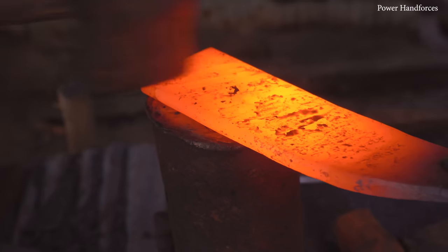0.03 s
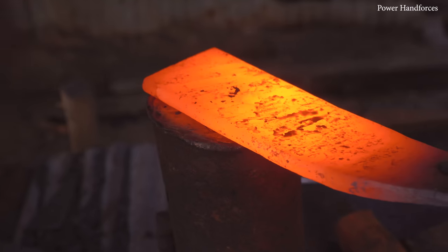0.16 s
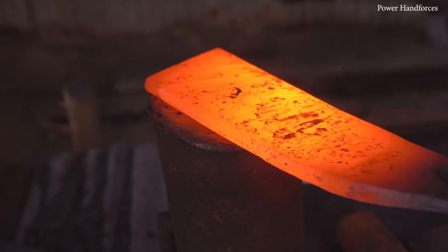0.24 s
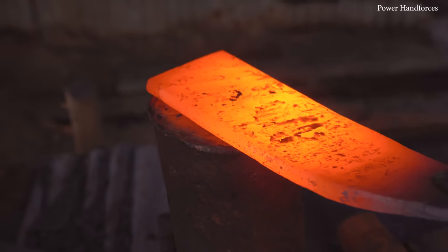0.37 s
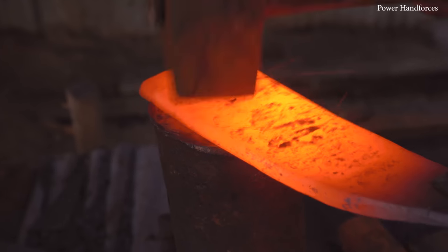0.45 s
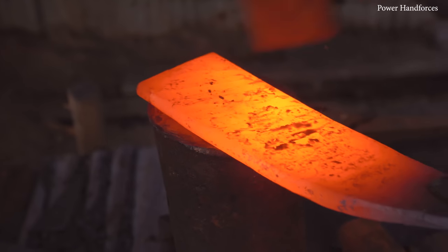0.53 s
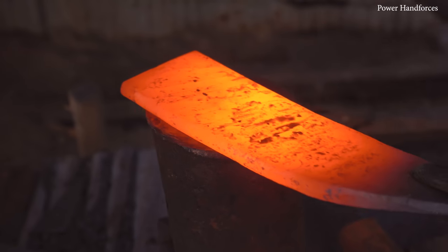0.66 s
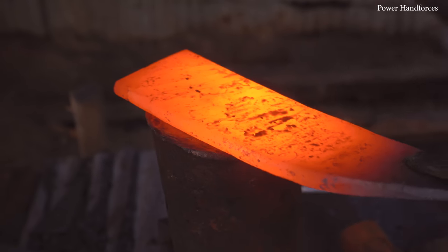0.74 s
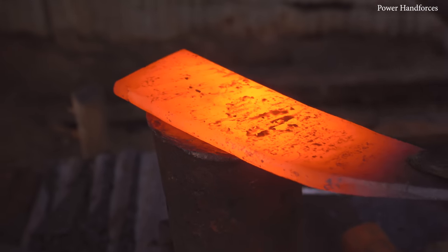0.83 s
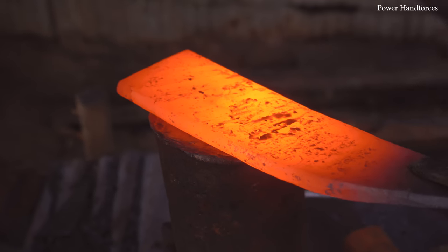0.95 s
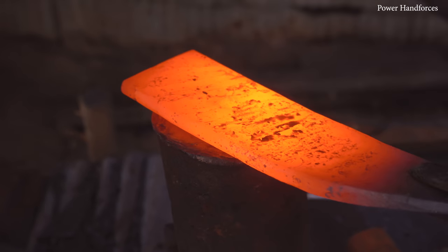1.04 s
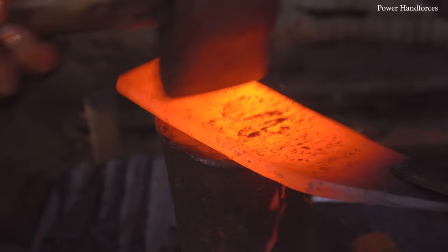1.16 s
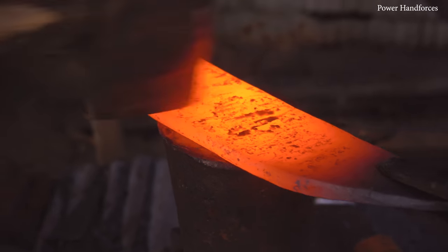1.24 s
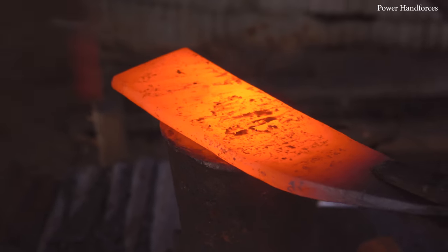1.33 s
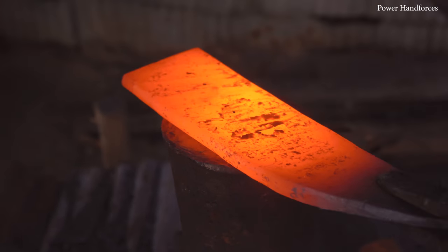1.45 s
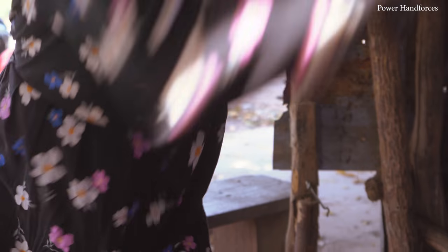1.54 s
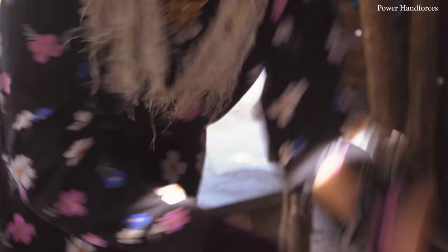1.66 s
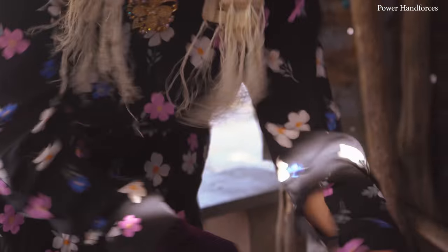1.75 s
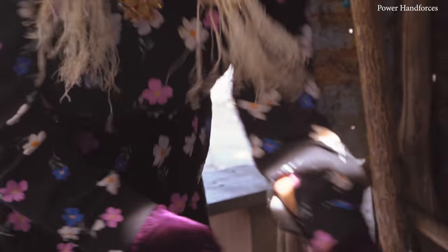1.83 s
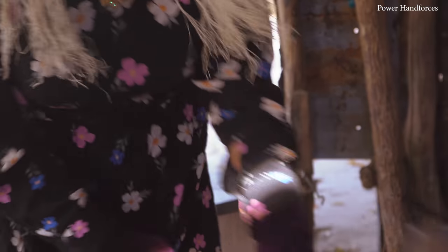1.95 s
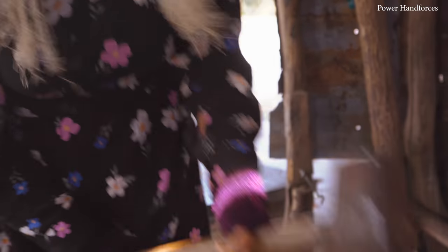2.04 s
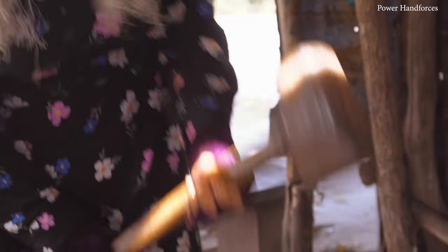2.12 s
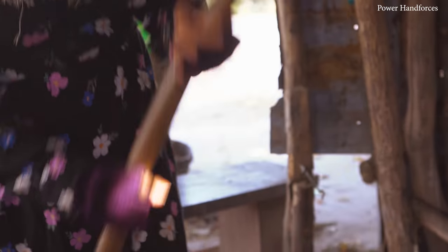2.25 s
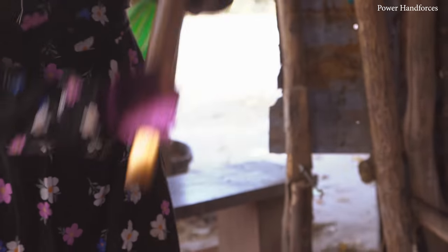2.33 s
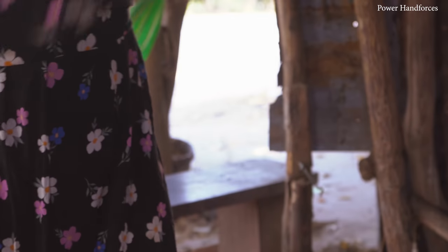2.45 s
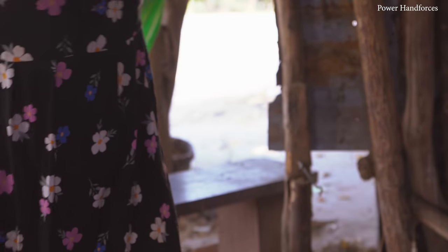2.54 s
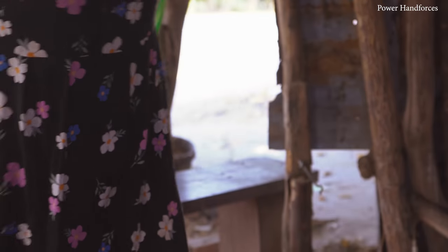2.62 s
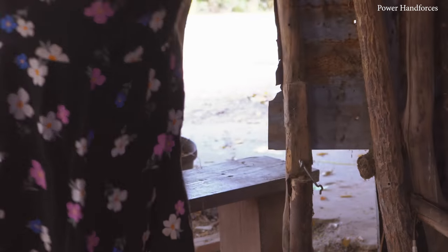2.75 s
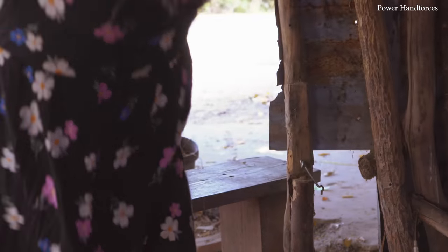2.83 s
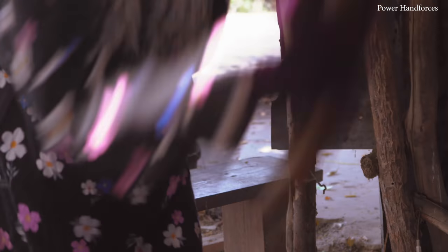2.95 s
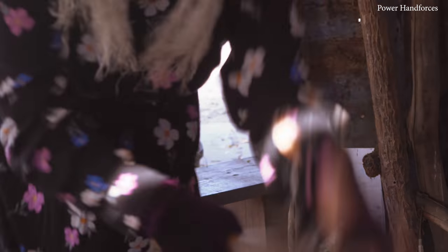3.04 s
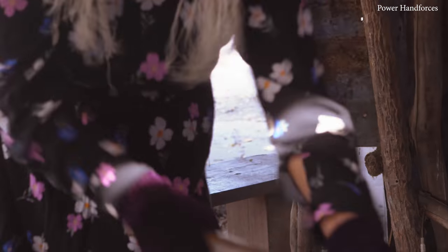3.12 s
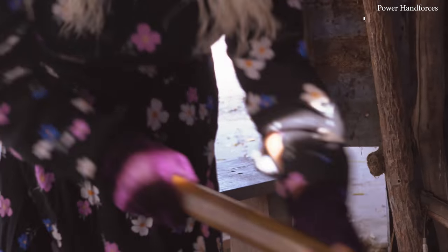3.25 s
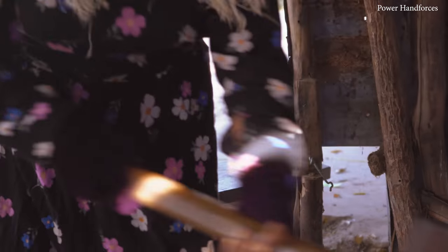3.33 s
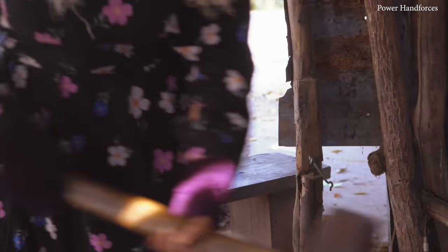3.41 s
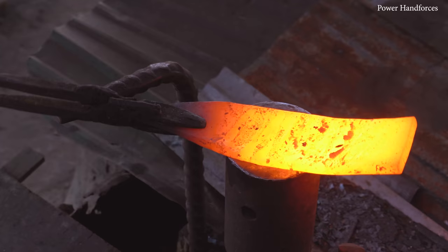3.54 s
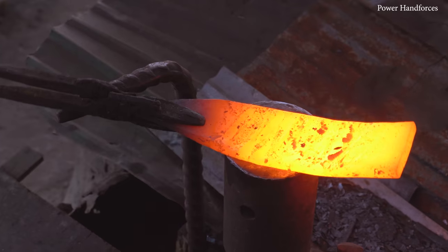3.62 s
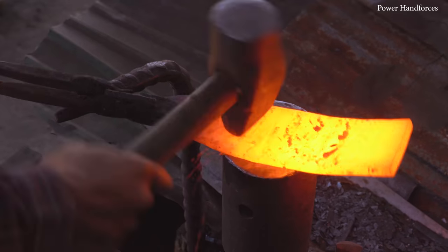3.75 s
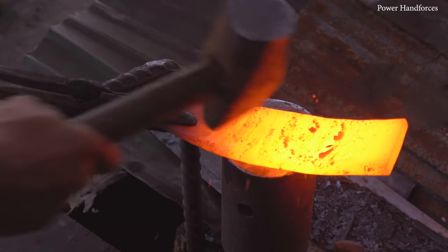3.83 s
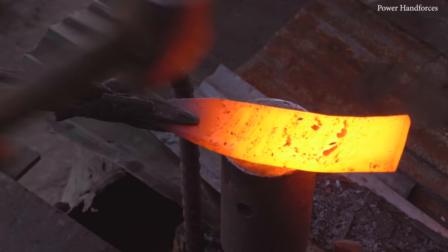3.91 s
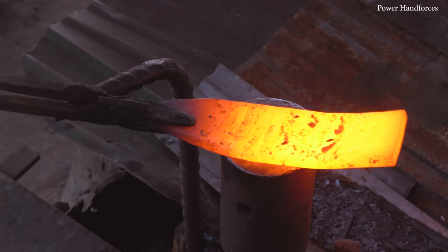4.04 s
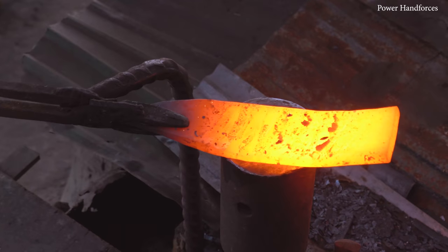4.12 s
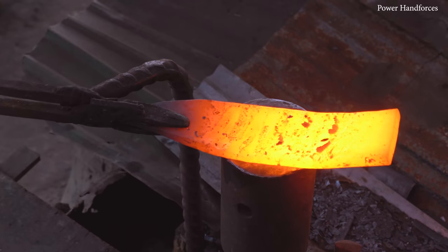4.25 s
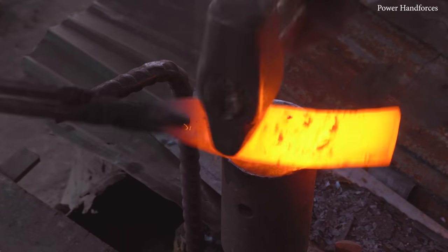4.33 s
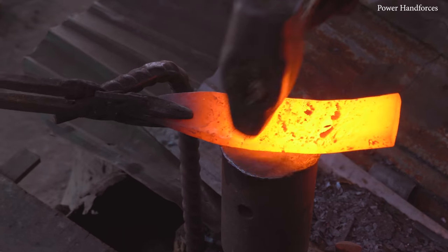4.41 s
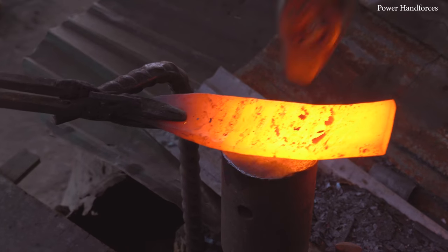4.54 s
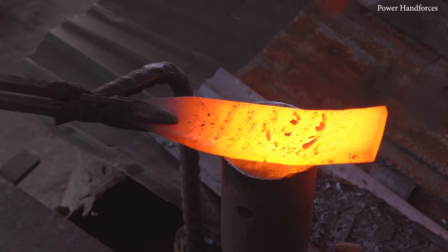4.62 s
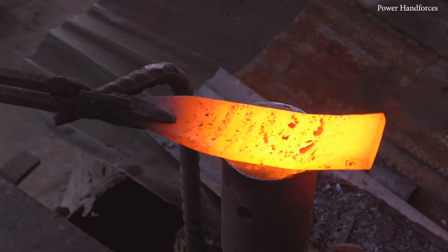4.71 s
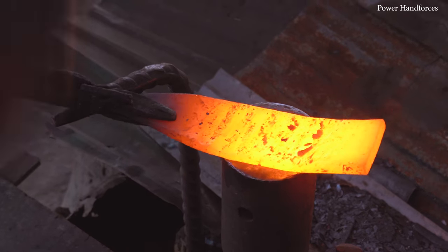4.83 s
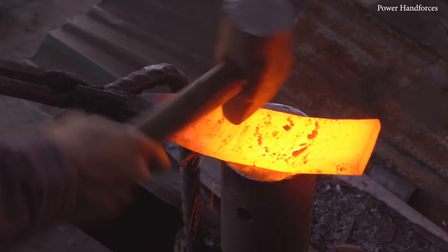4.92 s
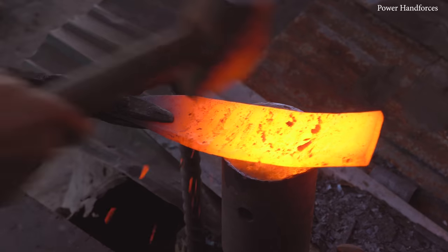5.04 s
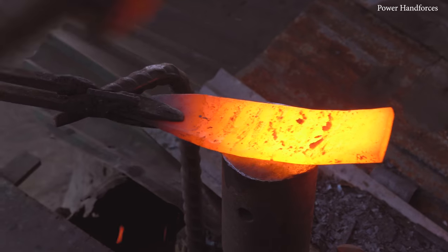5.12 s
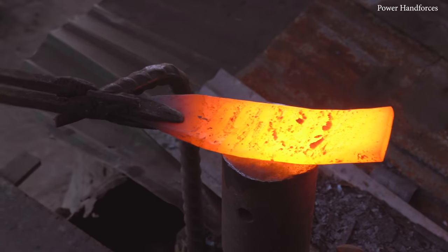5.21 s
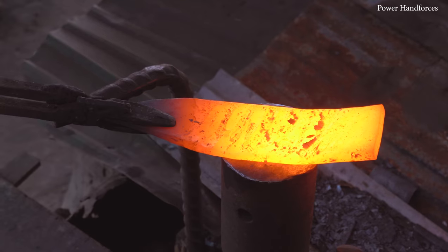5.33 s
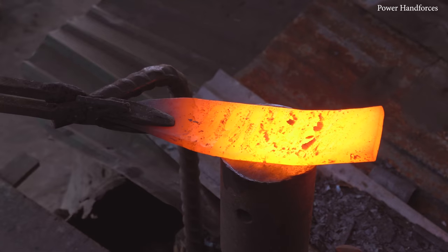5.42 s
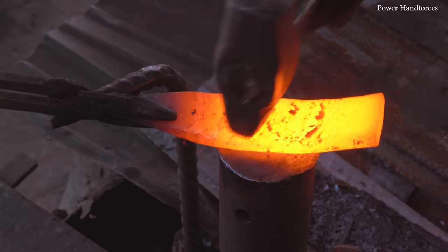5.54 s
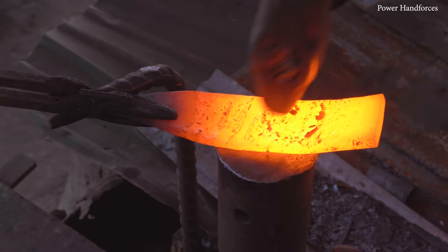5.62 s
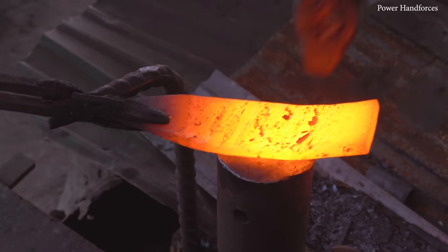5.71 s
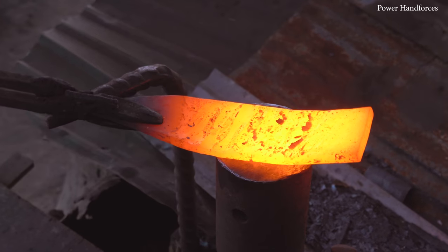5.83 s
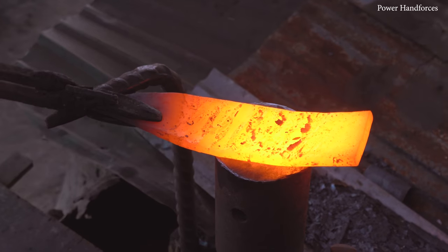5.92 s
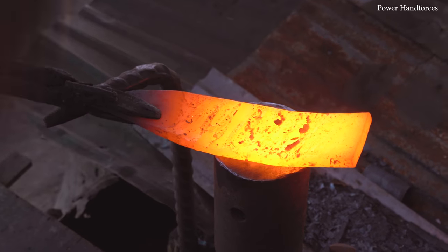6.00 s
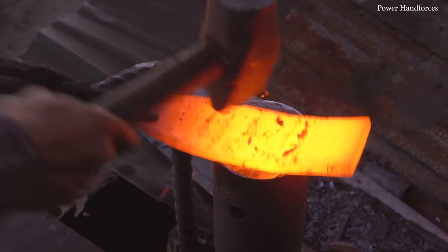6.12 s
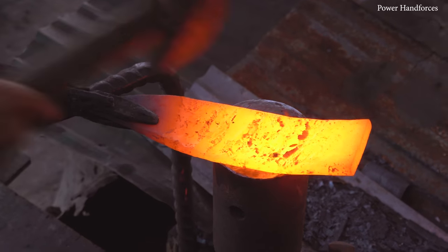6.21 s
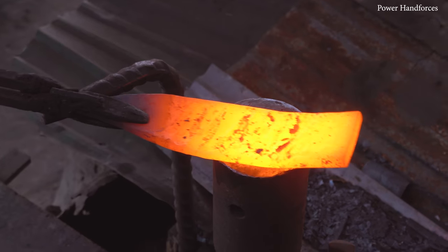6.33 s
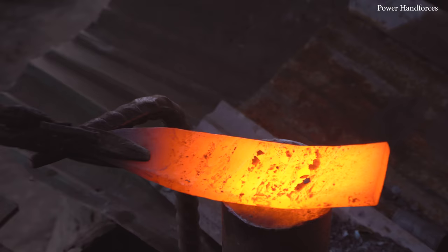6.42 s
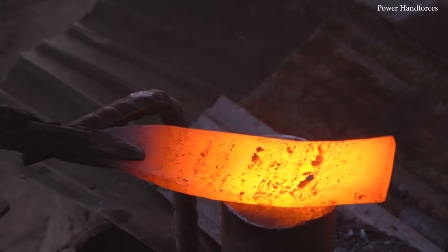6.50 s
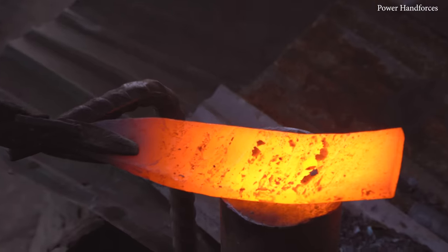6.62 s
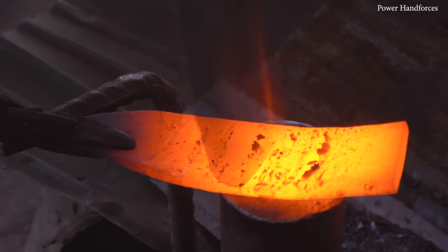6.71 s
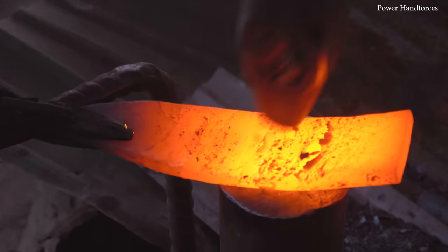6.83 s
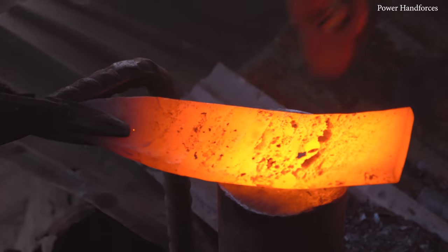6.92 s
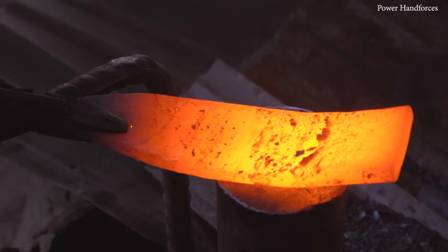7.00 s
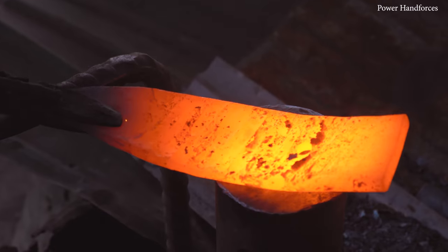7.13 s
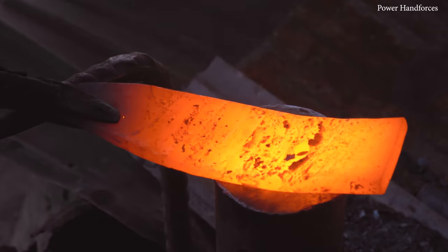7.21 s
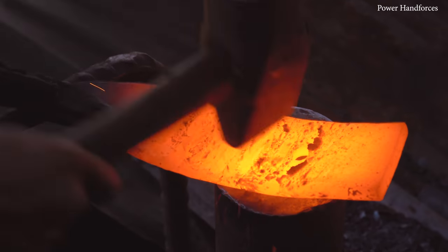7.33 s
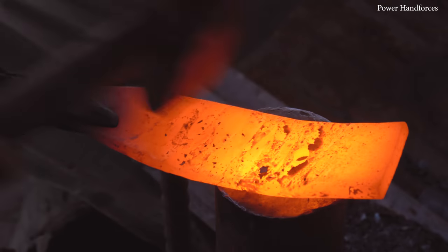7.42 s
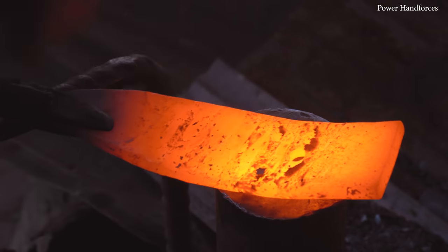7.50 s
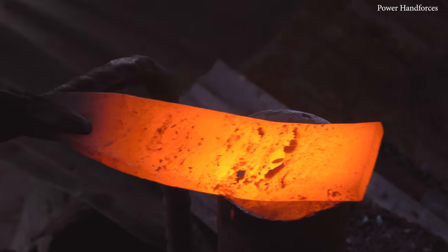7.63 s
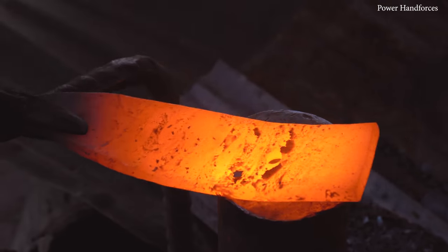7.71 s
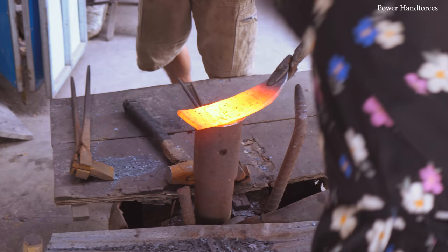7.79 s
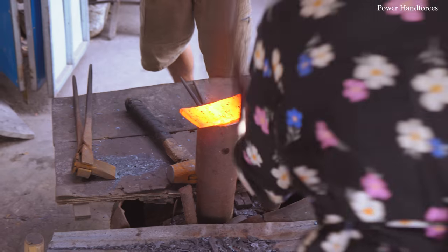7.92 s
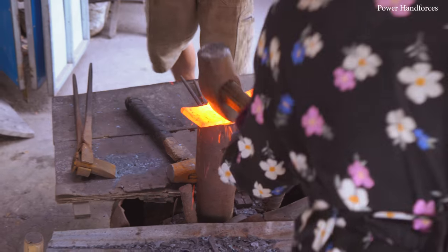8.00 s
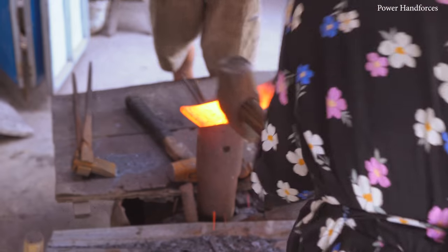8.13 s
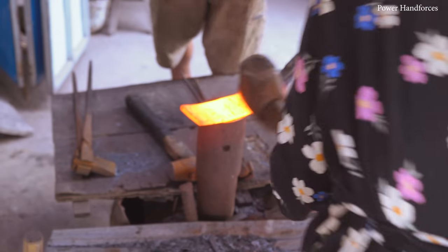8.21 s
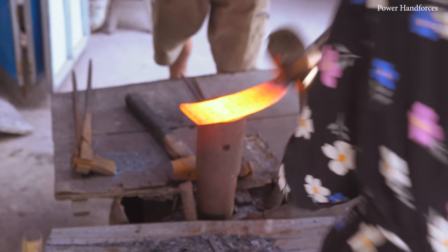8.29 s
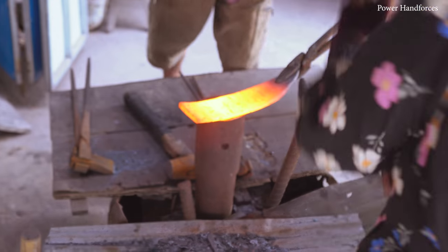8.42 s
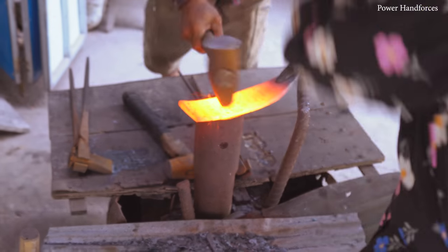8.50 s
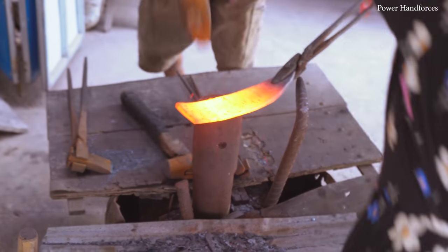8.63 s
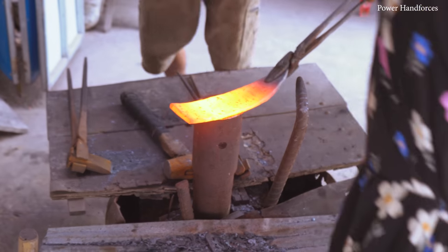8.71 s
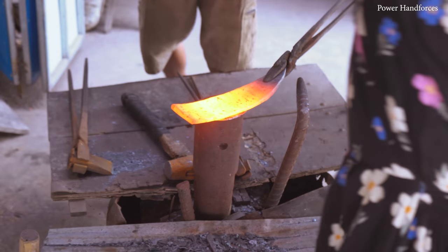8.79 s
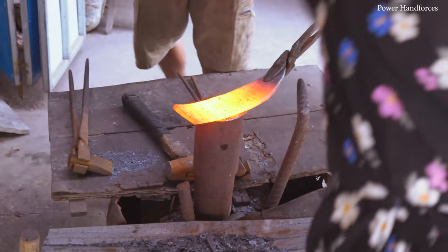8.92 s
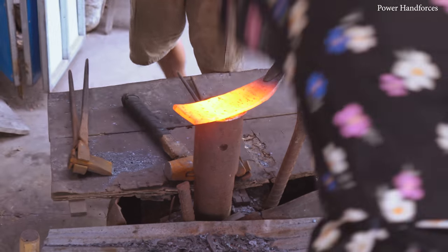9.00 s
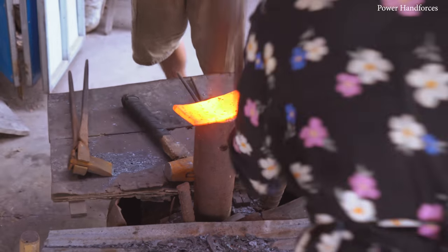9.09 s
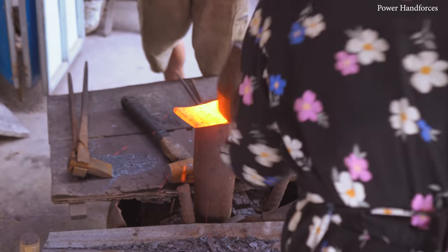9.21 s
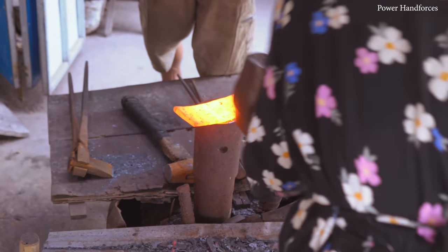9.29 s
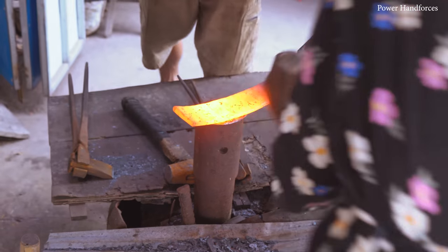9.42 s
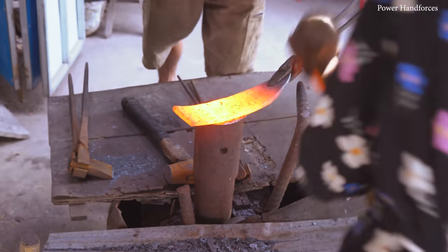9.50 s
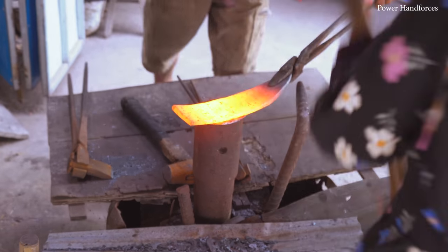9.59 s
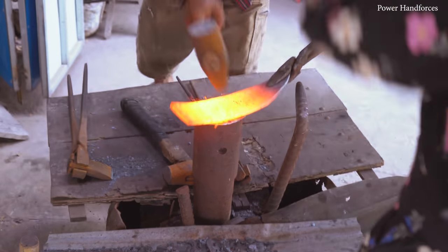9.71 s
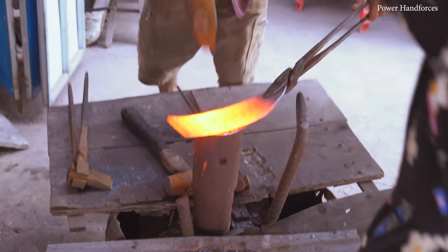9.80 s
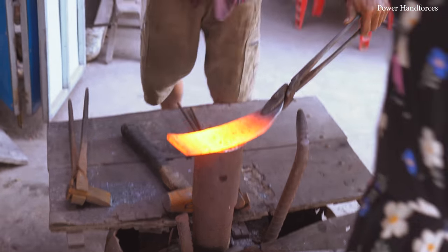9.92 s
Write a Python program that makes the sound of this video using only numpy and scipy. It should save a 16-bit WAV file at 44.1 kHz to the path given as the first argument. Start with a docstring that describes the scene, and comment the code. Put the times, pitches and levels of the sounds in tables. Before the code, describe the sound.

A heavy and a light hammer take turns striking a hot steel bar on a post anvil, starting at once and landing about every 0.6 seconds, seventeen blows in ten seconds. Each is a sharp, close crack with a short, deadened clank, a brief ring and a varying wooden thud. The sheet-metal workshop answers with an echo that dies fast, and the blows grow slightly duller over time. Scale flakes and small contacts tick between them, most clearly just after the blow at 1.3 seconds. Cloth and tongs rustle faintly, mainly from 6 to 8 seconds. Well behind, a rush like traffic swells until 3.6 seconds, changes tone and fades, then returns abruptly near 7.9 seconds and grows to the end. A faint hum sits under it from 1.5 to 3.6 seconds and again around 8 to 9. A loose part rattles quietly with a thin whine from 3.6 to about 7 seconds.

```python
"""Sharp cracks as a heavy and a light hammer take turns on a hot steel bar on a post anvil.
Hot steel deadens each blow to short rings; a sheet-metal roof and walls answer with a swell that
dies fast. Scale flakes tick, cloth and tongs rustle. Behind them a rushing noise, perhaps traffic,
swells and fades, heard from three places in turn; a loose part rattles and something hums."""
import sys
import numpy as np
from scipy import signal
from scipy.fft import rfft, irfft, next_fast_len
from scipy.io import wavfile
from scipy.ndimage import map_coordinates

SR = 44100
rng = np.random.default_rng(int(sys.argv[2]) if len(sys.argv) > 2 else 0)


def pcm_store(signal):
    """Save signal as 16-bit PCM."""
    levels = np.round(np.clip(np.atleast_2d(signal), -1, 1) * 32767)
    wavfile.write(sys.argv[1], SR, levels.astype(np.int16).T)


N = 438794

# Each row: start in seconds, hammer, relative levels in dB of swell (with all rings but the bar's),
# stump thud, hammer ring and bar clank, then clank pitch in Hz.
HAMMER_BLOWS = [(0.0476, "heavy", -18.5, -6.5, -8, -7, 4600), (0.5885, "light", -20, -5, -4, -10, 2420),
                (1.2543, "heavy", -19, 0, -1, -7, 5100), (1.8401, "light", -20, -4, -7, -15, 1950),
                (2.4395, "light", -20.5, -15.5, 1, -8, 1800),
                (3.215, "heavy", -18.5, -7.5, 4.5, -10.5, 1780),
                (3.8902, "light", -21, -13, 4, -10.5, 2060), (4.485, "heavy", -21, 2.5, -11, -5.5, 2030),
                (5.0479, "light", -22.5, -13.5, -2, -9.5, 2060),
                (5.656, "heavy", -20.5, -2.5, -6, -6.5, 2060),
                (6.2189, "light", -20.5, -10, -1, -7.5, 2100), (6.8728, "heavy", -21, -5, -24, -9.5, 2050),
                (7.4371, "light", -24, -9, 5, -9.5, 1980), (8.0798, "heavy", -20, -12.5, -7.5, -7, 1934),
                (8.6397, "light", -22, -14, -5.5, -11.5, 1960),
                (9.247, "heavy", -22.5, -6.5, -9, -4.5, 1930), (9.8153, "light", -21.5, -15, 3, -7.5, 1930)]
# Anvil post, wooden stump, hammer heads. Each row: mode in Hz, relative level in dB, T60 in seconds.
POST_MODES = [(1252, -32.5, 0.08), (1420, -35, 0.045), (2130, -22.5, 0.02)]
STUMP_MODES = [(195, -50, 0.071), (331.7, -26, 0.12), (550, -32.5, 0.07), (670, -38.5, 0.089),
               (820, -47, 0.042)]
LIGHT_HEAD_MODES = [(5760, -24, 0.075), (6770, -34, .05), (9056, -30, 0.067), (11610, -41, 0.05),
                    (13351, -35, 0.06)]
HEAVY_HEAD_MODES = [(4745, -29, 0.04), (7185, -40, .08), (8258, -28, 0.13)]
HEAD_MODES = {"light": LIGHT_HEAD_MODES, "heavy": HEAVY_HEAD_MODES}
# Hot bar. Each row: multiple of the clank pitch, relative level in dB, T60 in seconds.
BAR_MODES = [(1, -0.8, 0.015), (.66, -7.5, 0.017), (.8, -12.5, 0.011)]
# Impact noise and room swell. Each row: frequency in Hz, relative density in dB.
CRACK_SPECTRUM = [(180, -21), (300, -13.5), (1980, 4), (2550, -3.5), (3750, -2.5), (8010, -2), (10700, -14),
                  (13700, -11.5), (15700, -23), (16800, -60)]
SWELL_SPECTRUM = [(35, -70), (60, -43), (230, -35), (328, -6), (577, -5.5), (649, -2), (1020, -6),
                  (1410, -1), (1550, -4), (2010, -1), (3630, -9), (7190, -4.5), (13600, -22.5),
                  (15700, -26), (16800, -73)]
# Workshop reverberation. Each row: frequency in Hz, build-up in seconds, T60 in seconds.
SHOP_DECAY = [(148, 0.035, 0.43), (330, 0.026, 0.33), (717, 0.025, 0.39), (2000, 0.032, 0.33),
              (5900, 0.024, 0.35), (14200, 0.032, 0.25)]
# Flakes and small contacts. Each row: start in seconds, relative level in dB, centre in Hz.
CONTACT_TICKS = [(0.407, -33.5, 5500), (0.874, -29.5, 5900), (0.9906, -42, 6000), (1.0714, -47, 10000),
                 (1.3371, -6.5, 4630), (1.4675, -21.5, 4870), (4.997, -19, 2060), (5.333, -32, 3370),
                 (5.906, -28, 6200), (6.118, -34, 6100), (6.538, -45, 1980), (7.966, -24, 5100),
                 (8.3646, -31, 6540), (8.525, -23, 7100), (9.72, -27, 2340)]
# Cloth and tongs. Each row: middle in seconds, Gaussian width in seconds, level in dB.
ARM_SWINGS = [(0.5, 0.045, -57.5), (1.55, 0.036, -60), (5.97, .04, -59), (6.16, .045, -51.5),
              (6.52, 0.073, -58.5), (7.36, 0.065, -60), (7.72, 0.07, -61)]
# Rush nearing and leaving, one list per place. Each row: time in seconds, roar level in dB.
RUSH_LEVELS = [
    [(0.0, -60.5), (1.25, -60.5), (1.7, -54), (2.5, -50.5), (3.6, -45)],
    [(3.61, -48.5), (4.3, -56.5), (5.2, -59), (6.3, -63.5), (7.2, -72), (7.86, -66)],
    [(7.87, -50), (8.55, -49), (9.3, -45.5), (9.95, -38)],
]
# Rush colour, one list per place. Each row: frequency in Hz, relative density in dB.
RUSH_SPECTRA = [
    [(15, -85), (25, -46), (128, -9.5), (167, -11), (226, -4.5), (389, -9), (634, -5.5), (1280, -7),
     (1600, -7), (5420, -11), (10100, -25), (14800, -32), (16500, -62)],
    [(15, -65), (25, -31.5), (349, -15), (389, -6.5), (496, -11.5), (900, -8.5), (1220, -7.5), (1510, -3),
     (1780, -1.5), (2900, -5.5), (3150, -5.5), (4130, -6.5), (11600, -23.5), (16500, -37)],
    [(15, -66), (25, -30), (154, -16.5), (182, -14), (457, -7.5), (568, -3.5), (854, -3), (1470, -1),
     (3230, -8.5), (7510, -12), (11000, -30.5), (15200, -28), (16500, -56)],
]
# Rush bands per place. Each row: rumble and hiss over mean roar in dB, rumble dB per dB of roar.
RUSH_BALANCES = [(-9, -4.5, 0.89), (-6, 3, 0.1), (-9.5, -2.5, 0.5)]
# Loose part. Each row: time in seconds, relative rattle level in dB, relative whine level in dB.
RATTLE_LEVELS = [(3.6, -52.5, -63), (3.88, -56, -55), (4.2, -59.5, -62), (4.45, -52, -60), (4.74, -57, -66),
                 (4.97, -55, -64), (5.45, -60.5, -64), (5.62, -68, -68), (6.0, -76, -71), (7.0, -73, -64.5)]
# Each row: multiple of the whine pitch, relative level in dB, fade in dB/s.
WHINE_PARTIALS = [(.78, -6, 3), (1, 2.5, 0.4), (1.285, -0.5, 2.5), (1.53, -3, 2), (1.7, -8, 6)]
# Each row: start and fade start in seconds, pitch in Hz, creep in Hz/s, level in dB, fade in dB/s.
HUM_TONES = [(1.5, 3.58, 226, 3, -63.5, 600), (1.4, 3.58, 780, -3, -63.5, 600),
             (7.865, 9.3, 179, 4.5, -61, 26)]
# Stereo noise field. Each row: frequency in Hz, left-right correlation.
STEREO_COHERENCE = [(60, .99), (250, 1), (500, 0.94), (1000, 0.71), (2000, 0.17), (4000, 0.059),
                    (12000, 0.2)]
# Stereo balance. Each row: frequency in Hz, left minus right in dB.
STEREO_LEAN = [(60, 0.1), (110, -1), (200, 0.5), (380, -0.5), (700, 0.0), (1290, -0.5), (2380, 0),
               (4400, -1.5), (8120, -9), (15000, -0.5)]

CRACK_DB, CRACK_T60_S, ECHO_REL_DB, ECHO_T60_S = -13.5, 0.0092, -2, 0.11
TILT_DB_PER_OCT, TILT_DRIFT_PER_S = 0.85, -0.0566  # crack and swell dull from blow to blow
MAX_LINEWIDTH_HZ, BLOW_HIGHPASS_HZ = 30, 186
BASS_PER_THUD, BASS_CORNER_HZ, USUAL_THUD_DB = 0.4, 700, -10.5  # a stronger thud deepens the swell
YARD_REL_DB, YARD_T60_S, YARD_LOWPASS_HZ = -37.5, 2.9, 2540  # faint, dull tail from outside
TICK_FRONT_T60_S, TICK_TAIL_T60_S = 0.0054, 0.16
FLAKES_PER_S, FLAKE_MIN_REL_DB, FLAKE_SPREAD_DB, FLAKE_HZ = 4.8, -52.5, 4, 10000
HISS_DB_PER_ROAR_DB = 0.83
KNOCKS_PER_S, RATTLE_HZ, WHINE_HZ = 48, 3150, 1500
PEAK_LIMIT, BAND_LIMIT_HZ = 0.99, 16900


def hammering():
    """Each blow cracks, clanks the bar, rings stump, post and hammer, and excites the shop."""
    track, t = np.zeros((2, N)), np.arange(SR // 4) / SR
    for start_s, hammer, swell_db, thud_db, head_db, clank_db, clank_hz in HAMMER_BLOWS:
        clank = rings([(ratio * clank_hz, db, t60_s) for ratio, db, t60_s in BAR_MODES], clank_db, t)
        body = rings(STUMP_MODES, thud_db, t) + rings(POST_MODES, 0, t)
        body += rings(HEAD_MODES[hammer], head_db, t)
        add(track, crack(start_s, t) + clank + amp(swell_db + 15) * body, start_s)
        add(track, amp(swell_db + 35) * shop_swell(body, thud_db, start_s), start_s)
    return signal.sosfilt(signal.butter(4, BLOW_HIGHPASS_HZ, "high", fs=SR, output="sos"), track)


def crack(start_s, t):
    """Impact noise: a fast decay, then a slower one for the close echoes."""
    noise = filtered(stereo_noise(len(t)), lambda hz: amp(along(CRACK_SPECTRUM, hz)) * tilt(hz, start_s))
    decay = amp(-60 * t / CRACK_T60_S) + amp(ECHO_REL_DB - 60 * t / ECHO_T60_S)
    attack = 1 - np.exp(-t / 0.00033)
    return amp(CRACK_DB) * unit(noise) * attack * decay


def rings(modes, gain_db, t):
    """Damped modes, at new strengths each blow; a random phase walk blurs each pitch."""
    total = 0
    for hz, db, t60_s in modes:
        linewidth_hz = MAX_LINEWIDTH_HZ * hz / (hz + 2000)
        blur = np.sqrt(2 * np.pi * linewidth_hz / SR) * np.cumsum(rng.standard_normal(len(t)))
        envelope = amp(gain_db + db + rng.normal(0, 2.15) - 60 * t / t60_s)
        total += envelope * np.sin(2 * np.pi * hz * t + blur)
    return (1 - np.exp(-t / 0.00026)) * total


def shop_swell(body, thud_db, start_s):
    """Roof and walls return the pulse of a blow and the rings of stump, post and hammer."""
    def colour(hz):
        bass_db = BASS_PER_THUD * (thud_db - USUAL_THUD_DB) / (1 + (hz / BASS_CORNER_HZ) ** 2)
        return amp(along(SWELL_SPECTRUM, hz) + bass_db) * tilt(hz, start_s)

    response = shop_response()
    pulse = filtered(response, colour)
    ringing = signal.fftconvolve(body[None], response, axes=1)[:, :pulse.shape[1]]
    return pulse / np.linalg.norm(pulse[0]) + amp(-10.5) * ringing


def shop_response():
    """Reflections build up, then each frequency dies at its own rate."""
    hz, t, spectra = signal.stft(stereo_noise(SR * 3 // 4), SR, nperseg=256)
    rise_s, t60_s = along(SHOP_DECAY, hz)[..., None]
    build_up = 1 - np.exp(-(t / rise_s) ** 2.26)
    yard = amp(YARD_REL_DB - 60 * t / YARD_T60_S) / (1 + (hz[:, None] / YARD_LOWPASS_HZ) ** 2)
    tail = signal.istft(spectra * build_up * (amp(-60 * t / t60_s) + yard), SR, nperseg=256)[1]
    return tail / np.linalg.norm(tail[0])


def ticks():
    """Flakes and small contacts: sharp-fronted noise puffs, the faint ones at random times."""
    track, t = np.zeros((2, N)), np.arange(SR // 5) / SR
    flakes = [(when * N / SR, FLAKE_MIN_REL_DB - FLAKE_SPREAD_DB * np.log(rank), FLAKE_HZ * 2 ** (u - .5))
              for when, rank, u in rng.random((round(FLAKES_PER_S * N / SR), 3))]
    decay = amp(-60 * t / TICK_FRONT_T60_S) + amp(4 - 60 * t / TICK_TAIL_T60_S)
    for start_s, db, centre_hz in CONTACT_TICKS + flakes:
        puff = unit(noise_band(len(t), centre_hz, octave_drop_db=9.5))
        add(track, amp(db - 19.5) * puff * decay, start_s)
    return track


def rustle():
    """Cloth and tongs as the arms swing: soft swells of grainy treble noise."""
    t = np.arange(N) / SR
    swells = sum(amp(db) * np.exp(-((t - mid_s) / width_s) ** 2 / 2) for mid_s, width_s, db in ARM_SWINGS)
    noise = noise_band(N, centre_hz=6500, octave_drop_db=7)
    return swells * unit(noise * amp(2.5 * wobble(40)))


def rush():
    """One level drives fluttering rumble, roar and hiss; the colour changes with the place."""
    def bands(hz):
        rumble = 1 / (1 + (hz / 400) ** 4)
        roar = 1 / (1 + (400 / (hz + 1)) ** 4) / (1 + (hz / 3000) ** 4)
        hiss = 1 / (1 + (3000 / (hz + 1)) ** 4)
        return np.array([rumble, roar, hiss])

    total = 0
    for rows, spectrum, (rumble_db, hiss_db, rumble_slope) in zip(RUSH_LEVELS, RUSH_SPECTRA,
                                                                  RUSH_BALANCES):
        (roar_db,), gate = curves(rows)
        mean_db = roar_db[gate].mean()
        swing_db = roar_db - mean_db
        levels_db = [mean_db + rumble_db + rumble_slope * swing_db,
                     roar_db,
                     mean_db + hiss_db + HISS_DB_PER_ROAR_DB * swing_db]
        layers = filtered(stereo_noise(N)[:, None], lambda hz: amp(along(spectrum, hz)) * bands(hz))
        flutter_db = 0.31 * wobble(4.1) + 0.78 * wobble(25)
        for band, db in enumerate(levels_db):
            total += gate * amp(db + flutter_db + 0.75 * wobble(3)) * unit(layers[:, band])
    return total


def rattle():
    """A loose part, knocked once a turn, rings briefly; thin fading whines go with it."""
    (rattle_db, whine_db), gate = curves(RATTLE_LEVELS)
    turns = np.cumsum(KNOCKS_PER_S * (1 + 0.0038 * wobble(4.4))) / SR
    knocks = np.diff(np.floor(turns), prepend=0) * amp(1.6 * wobble(25) + 1.2 * wobble(4.4))
    t = np.arange(SR // 40) / SR
    ring = np.sin(2 * np.pi * RATTLE_HZ * t) * amp(-60 * t / 0.025) * (1 - np.exp(-t / 0.0011))
    clatter = unit(signal.fftconvolve(knocks, ring)[:N]) * amp([[1], [-1]])  # slightly left
    elapsed_s = np.abs(np.arange(N) / SR - RATTLE_LEVELS[0][0])
    whine = 0
    for ratio, db, fade_db_per_s in WHINE_PARTIALS:
        tone = sine(ratio * WHINE_HZ * (1 + 0.007 * wobble(30)))
        whine += tone * amp(db - fade_db_per_s * elapsed_s + 2.6 * wobble(16))
    return gate * (amp(rattle_db) * clatter + amp(whine_db) * whine)


def hum():
    """Low tones that creep in pitch, waver and fade."""
    t, total = np.arange(N) / SR, 0
    for start_s, fade_s, hz, creep_hz_per_s, db, fade_db_per_s in HUM_TONES:
        level = amp(db - fade_db_per_s * np.clip(t - fade_s, 0, None) + 3 * wobble(9))
        pitch_hz = hz + creep_hz_per_s * (t - start_s) + 1.57 * wobble(7.3)
        total += (t > start_s) * level * np.sqrt(2) * sine(pitch_hz)
    return total


def tilt(hz, start_s):
    """Spectral tilt about 2 kHz for a blow at start_s, as a gain."""
    return amp((TILT_DB_PER_OCT + TILT_DRIFT_PER_S * start_s) * np.log2(np.clip(hz, 300, 12000) / 2000))


def stereo_noise(size):
    """White noise, left and right alike in the bass and apart in the treble."""
    def mid_side_gains(hz):
        angle = np.arccos(np.clip(along(STEREO_COHERENCE, hz), -1, 1)) / 2
        return np.array([np.cos(angle), np.sin(angle)])

    mid, side = filtered(rng.standard_normal((2, size)), mid_side_gains)
    return np.array([mid + side, mid - side])


def noise_band(size, centre_hz, octave_drop_db):
    """Stereo noise, bell-shaped in log frequency."""
    return filtered(stereo_noise(size), lambda hz: amp(-octave_drop_db * np.log2((hz + 1) / centre_hz) ** 2))


def amp(db):
    return 10 ** (np.asarray(db) / 20)


def unit(x):
    return x / np.sqrt(np.mean(x ** 2) + 1e-20)


def sine(hz):
    return np.sin(2 * np.pi * np.cumsum(hz) / SR)


def along(rows, hz):
    """Table columns interpolated over log frequency."""
    knots_hz, *columns = np.transpose(rows)
    return np.squeeze([np.interp(np.log(hz + 1), np.log(knots_hz + 1), column) for column in columns])


def curves(rows):
    """Table columns interpolated per sample, and a gate open over the table's time span."""
    knots_s, *columns = np.transpose(rows)
    t = np.arange(N) / SR
    gate = (t >= knots_s[0] - 0.005) & (t <= knots_s[-1] + 0.005)
    return [np.interp(t, knots_s, column) for column in columns], gate


def wobble(knots_per_s):
    """Smooth random curve."""
    knots = rng.standard_normal(int(N * knots_per_s / SR) + 4)
    return map_coordinates(knots, [np.arange(N) * knots_per_s / SR])


def filtered(x, gain_at_hz):
    """Zero-phase FFT filter."""
    size = next_fast_len(x.shape[-1] + 8192)
    return irfft(rfft(x, size) * gain_at_hz(np.fft.rfftfreq(size, 1 / SR)), size)[..., :x.shape[-1]]


def add(track, sound, start_s):
    part = track[:, round(start_s * SR):][:, :sound.shape[1]]
    part += sound[:, :part.shape[1]]


def scene():
    return hammering() + ticks() + rustle() + rush() + rattle() + hum()


def record(dry):
    """Treble leans right, peaks are rounded off, the band is limited."""
    leaned = filtered(dry, lambda hz: amp(along(STEREO_LEAN, hz) * [[0.5], [-0.5]]))
    rounded = leaned / (1 + np.abs(leaned / PEAK_LIMIT) ** 6) ** (1 / 6)
    return filtered(rounded, lambda hz: hz < BAND_LIMIT_HZ)


dry = scene()
out = record(dry)
pcm_store(out)
```